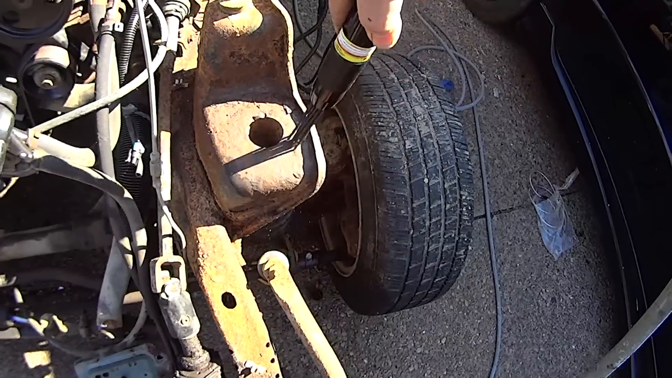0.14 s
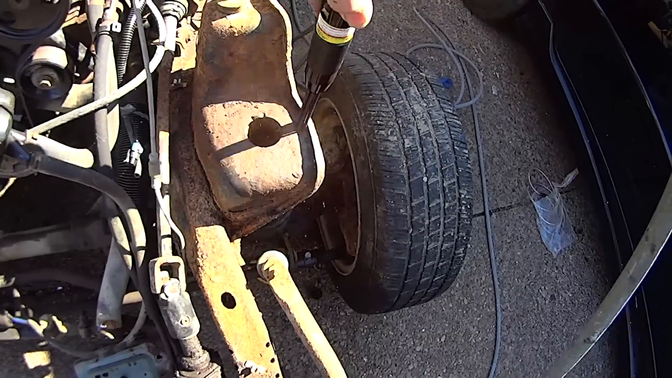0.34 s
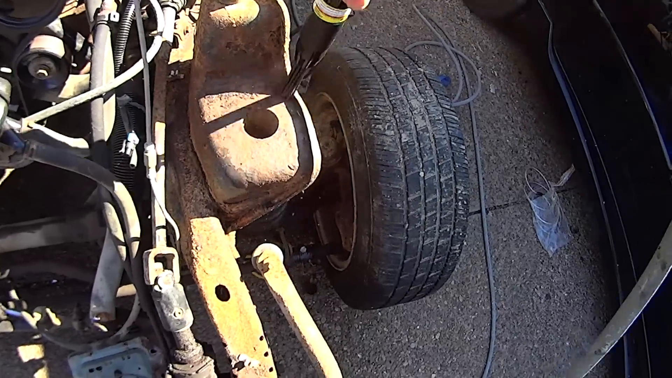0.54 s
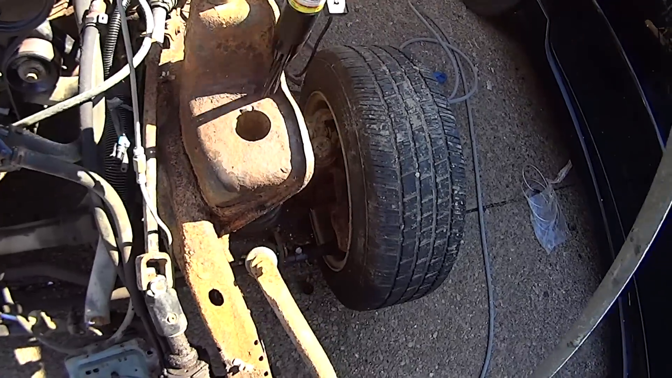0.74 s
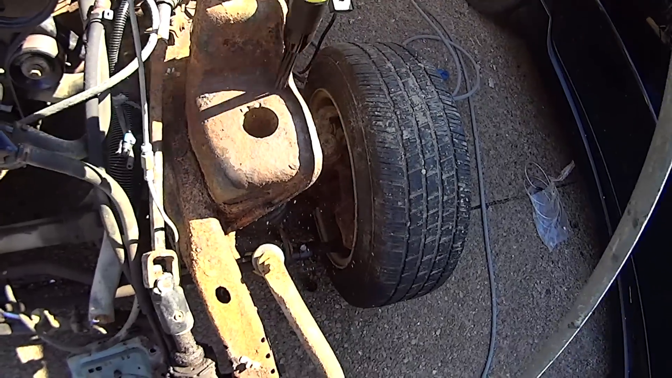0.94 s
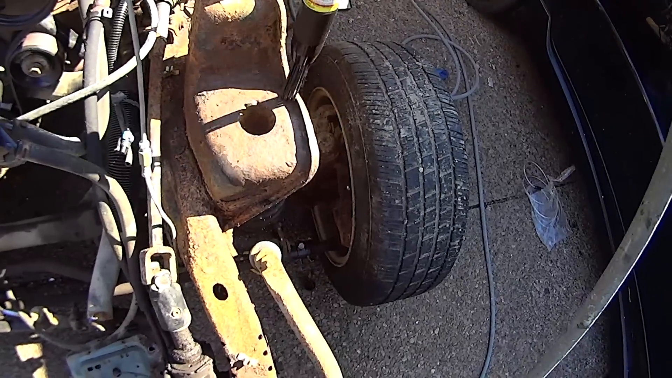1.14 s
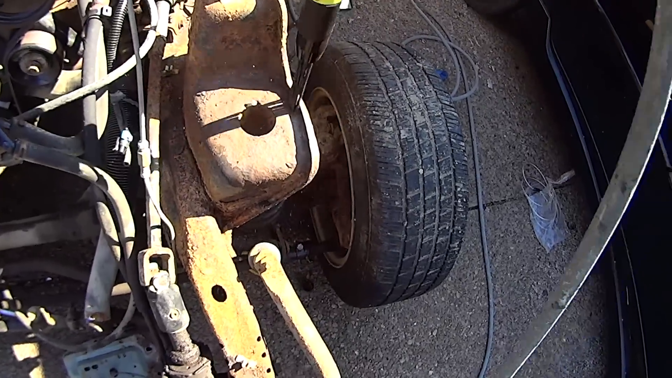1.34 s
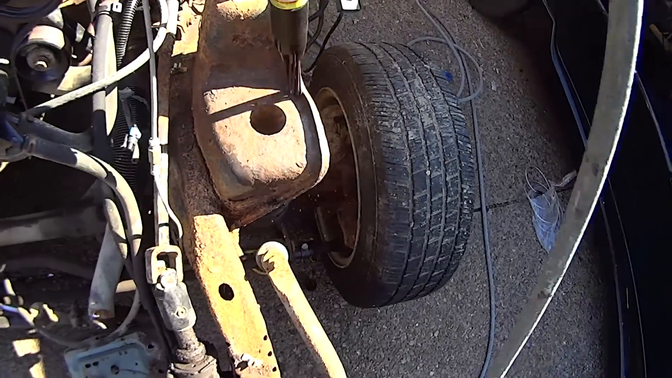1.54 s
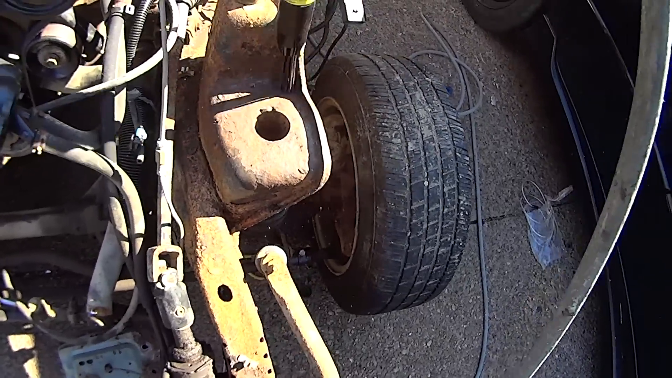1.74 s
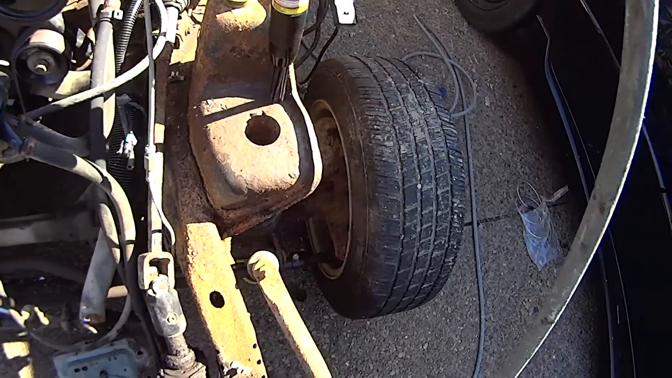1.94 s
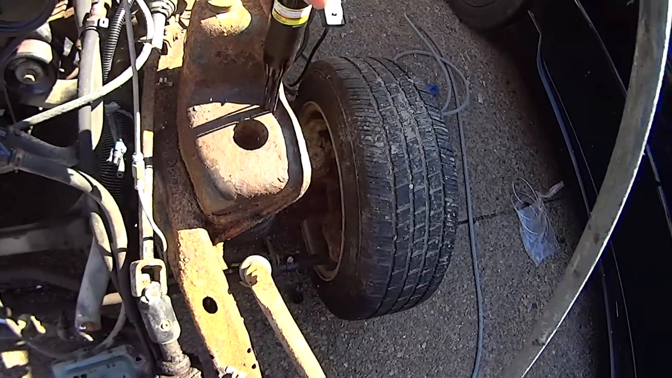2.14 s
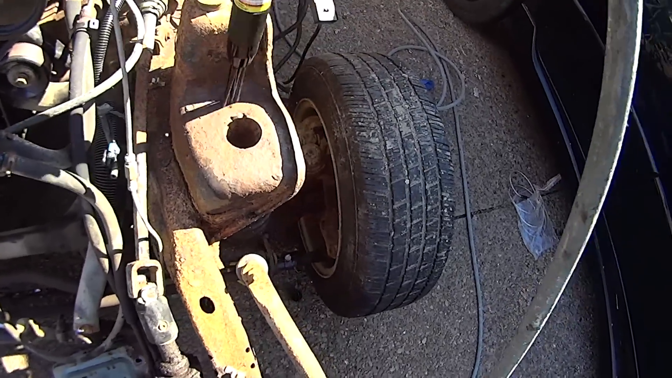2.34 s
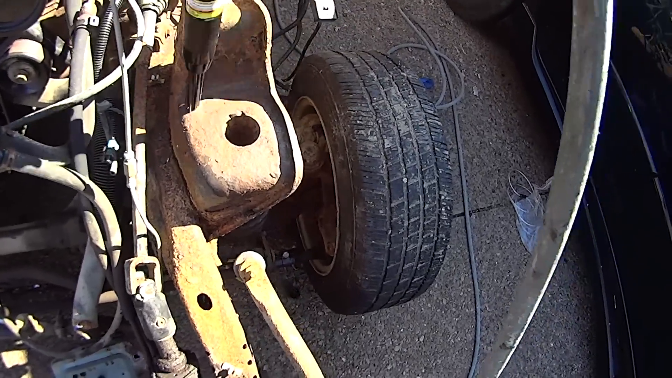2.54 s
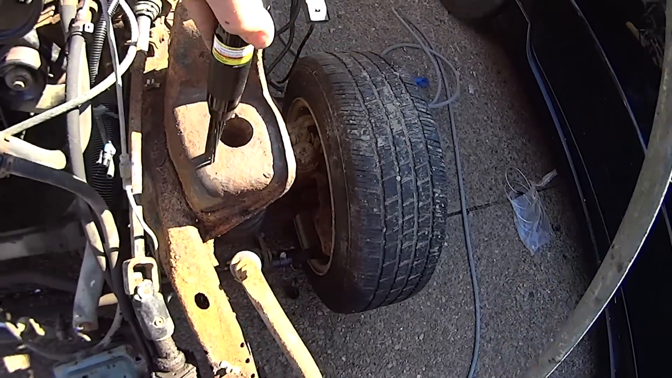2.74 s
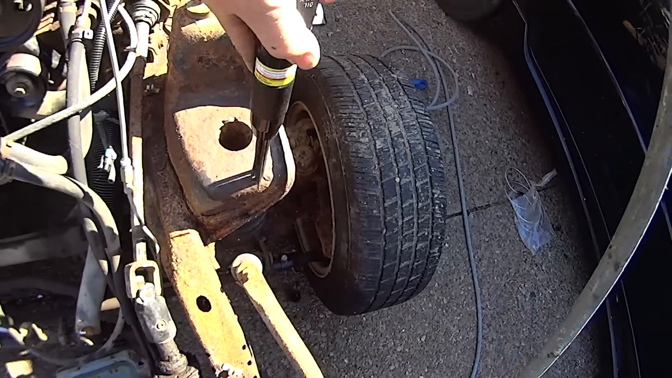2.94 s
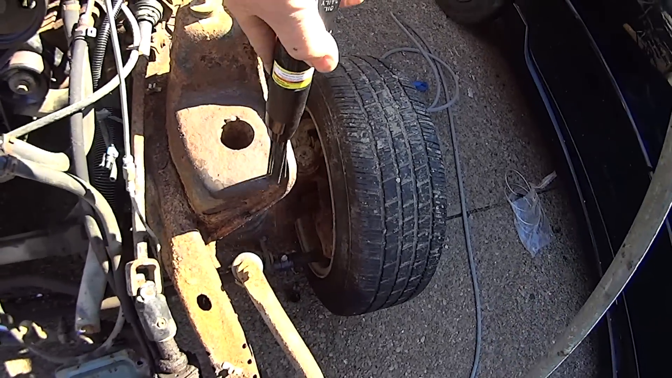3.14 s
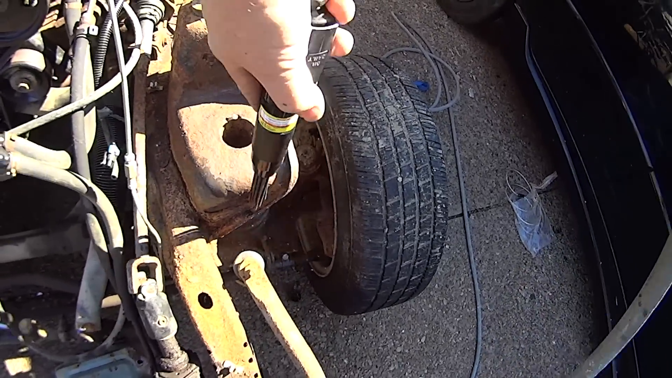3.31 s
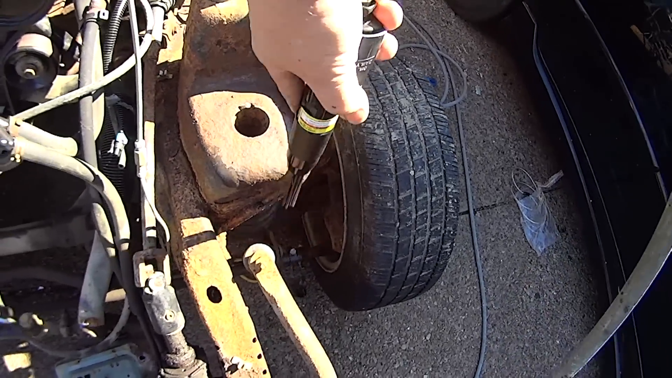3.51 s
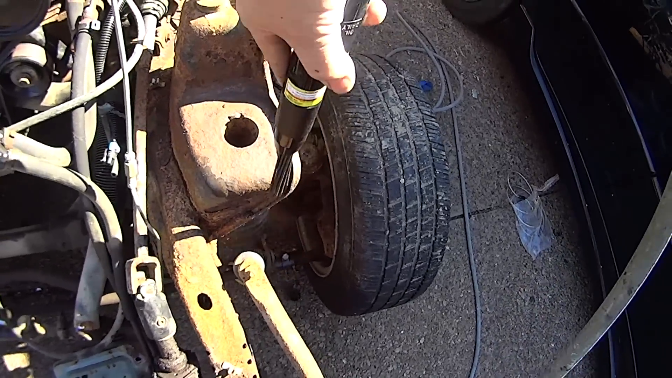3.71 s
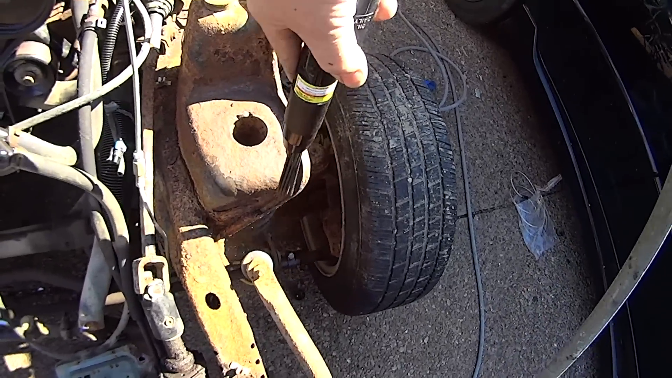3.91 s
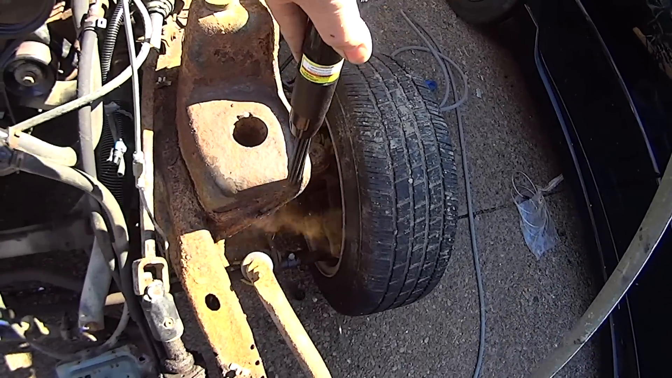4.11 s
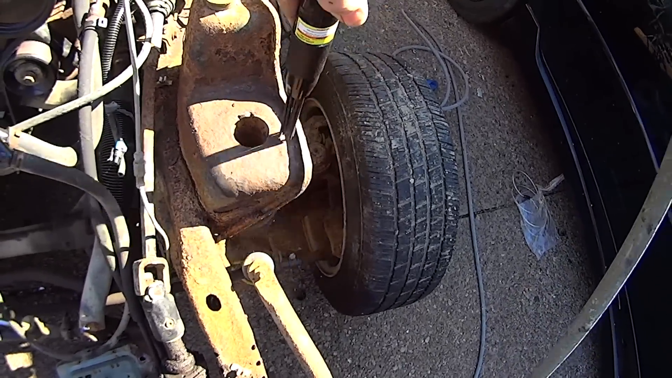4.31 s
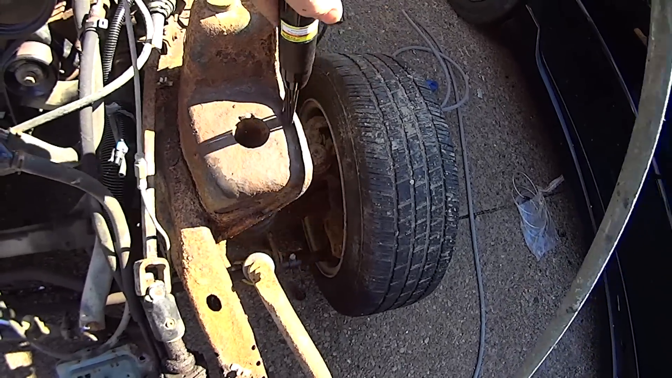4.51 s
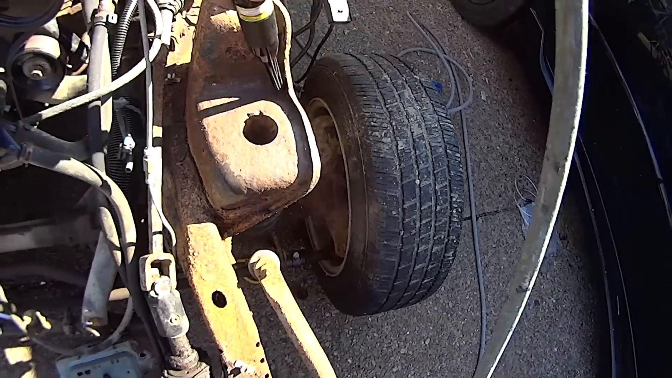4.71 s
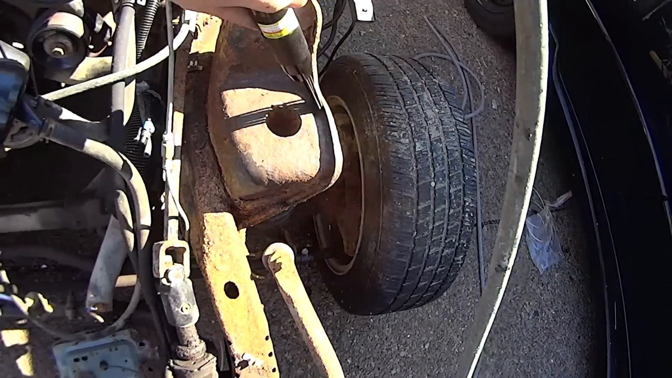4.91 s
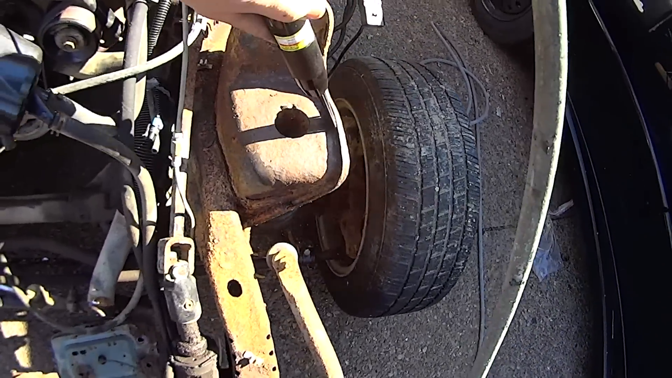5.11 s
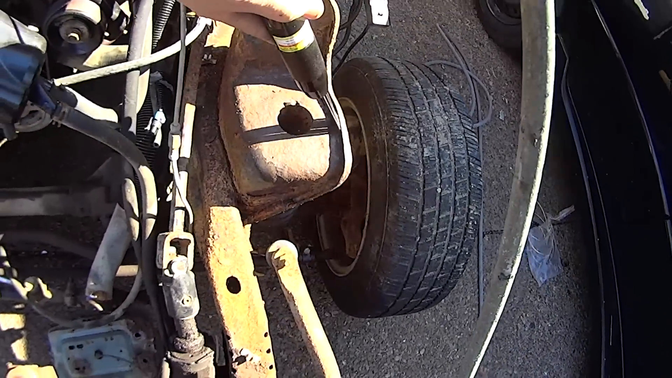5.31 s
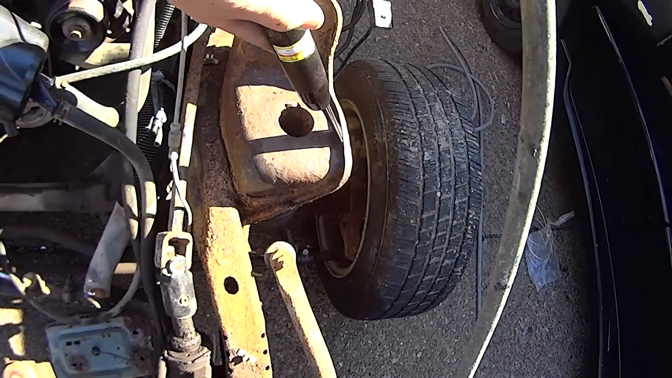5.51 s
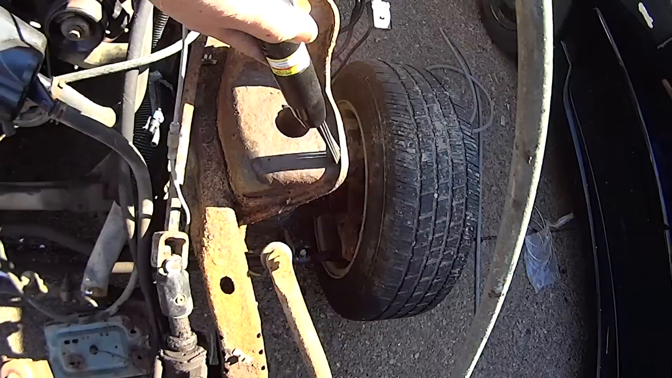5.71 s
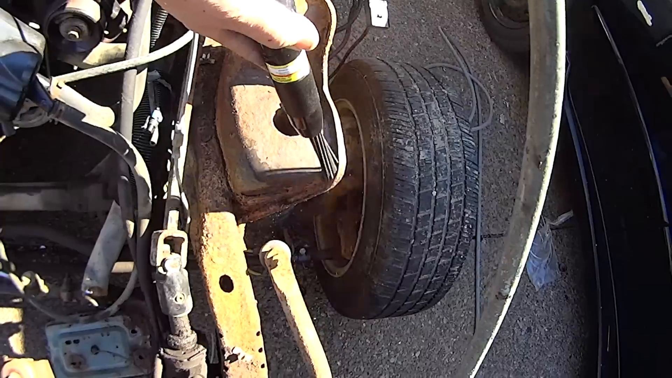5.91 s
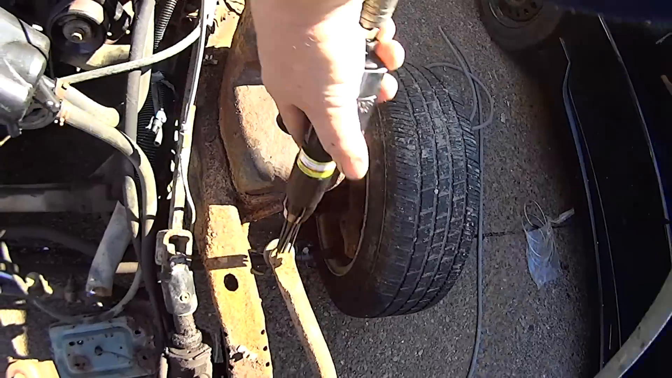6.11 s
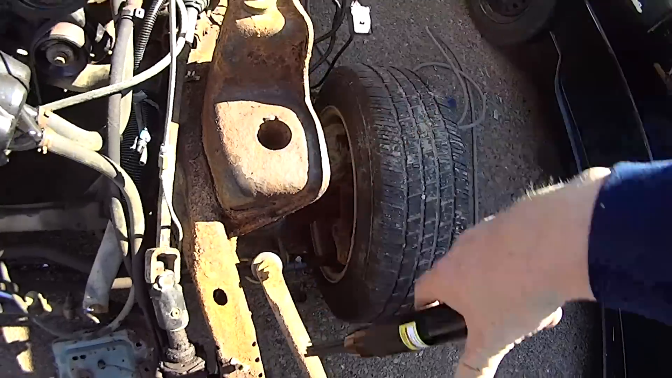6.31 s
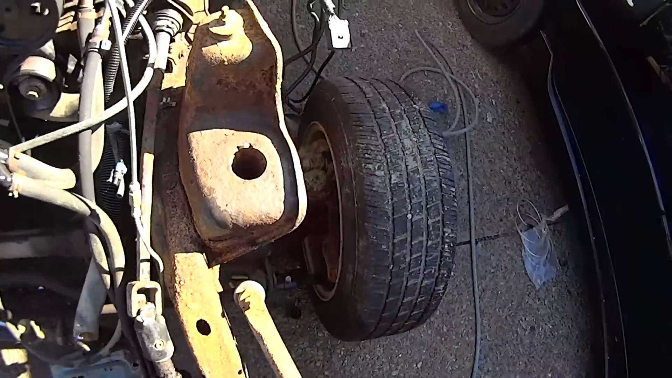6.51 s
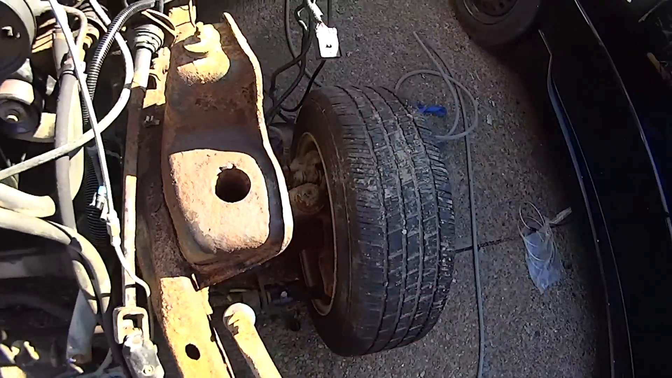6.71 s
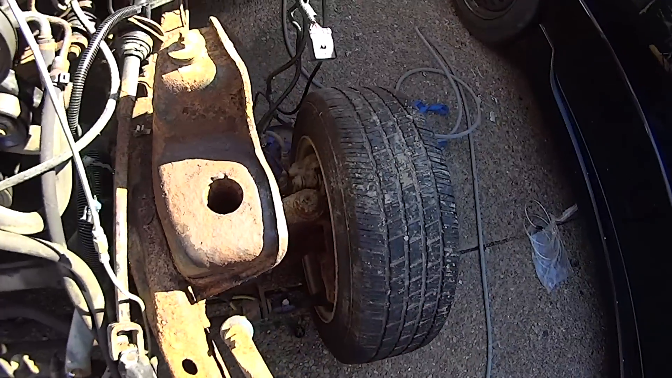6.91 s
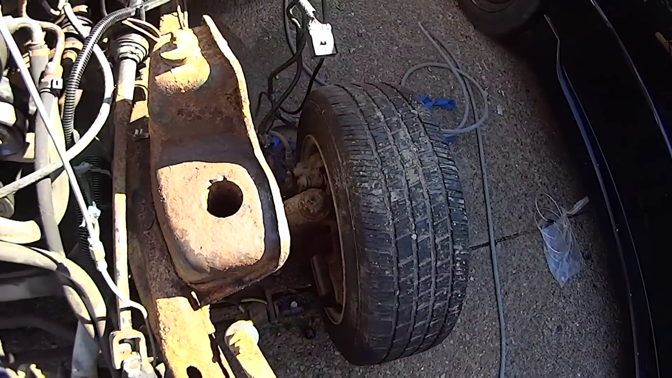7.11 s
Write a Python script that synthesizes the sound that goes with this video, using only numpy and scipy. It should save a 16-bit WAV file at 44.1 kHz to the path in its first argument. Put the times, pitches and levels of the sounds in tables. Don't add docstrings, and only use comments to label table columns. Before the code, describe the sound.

From 0 s a pneumatic needle scaler is already running at full rate, roughly eighty strokes a second, a loud, dense, gritty metallic rattle close to the microphone outdoors. Until 3 s it is slightly shaded and diffuse, with bright needle hiss and small fluctuating rings as it skips over the steel bracket. Around 3.1 s it bites the edge, jumps louder and turns crisper, a more regular hammering buzz. From 4.3 to 6 s it presses on bracket and rail, with rough, clanging steel resonances and a stronger barking exhaust; the tone shifts with each press. Near 6.0 s it thins and brightens, and at about 6.25 s it stops, with a brief clatter and high ring. Then near quiet: faint air-leak hiss with a thin whistle, a dying low hum to 6.7 s, soft wind bumps, faint knocks at 6.7 and 6.8 s, a harder one at 6.9 s, and stronger wind thumps toward 7.1 s.

```python
import sys
import numpy as np
from scipy import signal
from scipy.fft import rfft, irfft, next_fast_len
from scipy.io import wavfile
from scipy.ndimage import map_coordinates

SR = 44100
rng = np.random.default_rng(int(sys.argv[2]) if len(sys.argv) > 2 else 0)


def generate_wav(sig):
    pcm = np.round(np.clip(np.atleast_2d(sig).T, -1, 1) * 32767).astype(np.int16)
    wavfile.write(sys.argv[1], SR, pcm)


def to_linear_factor(level_db):
    exponent = np.asarray(level_db, float) / 20
    return 10 ** exponent


N = 315315

# time_s, needle_db, exhaust_db
TOOL_LEVELS = [(0.0, -29.5, -45.5), (0.15, -30.5, -49.5), (0.28, -30.5, -45), (0.4, -31.5, -48),
               (1.61, -31, -46.5), (1.81, -31.5, -45), (2.6, -31, -49.5), (3.11, -30, -47),
               (3.14, -24, -45), (3.23, -28, -41), (4.22, -27, -41.5), (4.33, -24.5, -46),
               (4.61, -26.5, -40), (5.14, -26, -37.5), (5.58, -26, -40.5), (5.96, -25.5, -39.5),
               (6.21, -27.5, -38), (6.24, -30.5, -79)]
# time_s, strokes_so_far
STROKE_COUNT = [(.0025, 0), (.1314, 10), (.5335, 42), (1.0368, 82), (1.5447, 122), (1.8528, 146),
                (2.4593, 194), (3.175, 250), (3.6008, 282), (3.8138, 298), (4.236, 330), (4.3455, 338),
                (4.4539, 346), (4.5601, 354), (4.6618, 362), (4.7652, 370), (4.9742, 386), (5.1855, 402),
                (5.3979, 418), (5.7185, 442), (6.0344, 466), (6.194, 478), (6.2085, 479), (6.2215, 480),
                (6.241, 482), (7.15, 550)]
# time_s, in_step_share, bunched_share
NEEDLE_TIMING = [(0, .12, .4), (3.05, .12, .4), (3.3, .97, .74), (4.2, .97, .72), (4.35, .7, .35),
                 (4.9, .85, .4), (5.97, .85, .45), (6.02, .97, .65)]
# time_s, share
REBOUND_SHARE = [(0, 0), (3.05, 0), (3.3, .05), (4.4, .08), (4.7, .3), (5.97, .35), (6.02, .12)]
REBOUND_AT, LULL = .44, .86

# freq_hz, level_db_per_hz
TIP_COLOUR = [(60, -64), (300, -13), (600, -2), (850, -11.5), (1020, -10.5), (1200, -11), (1450, -11.5),
              (1800, -9), (2500, -6), (3100, -4), (4200, -1.5), (5500, 3), (7000, -2.5), (8900, -6),
              (10300, -7.5), (11100, -8.5)]
# time_s, level_db
TIP_CONTACT = [(0, -3.5), (.5, 1), (1.2, 0.5), (1.65, 1), (2.1, 0.5), (2.55, 1), (2.75, -0.5), (2.9, -4),
               (3.1, -3), (3.3, -0.5), (3.7, 1), (4.2, -1.5), (4.6, 0.5), (5.2, -0.5), (5.6, -0.5),
               (6.0, -6.5), (6.2, -0.5)]
CONTACT_HZ = 4100
# freq_hz, width_hz, level_db
ROD_MODES = [(4600, 160, -9.5), (5590, 91, -5), (5890, 75, -7.5), (6720, 160, -8.5), (7725, 170, -1),
             (10253, 96, 1)]
# time_s, share
RODS_FREE_SHARE = [(0, 0), (3.25, 0), (3.35, 1), (4.6, 1), (4.8, 0), (6.0, 0), (6.1, 1)]
RODS_FREE_DB = 2
# freq_hz, level_db_per_hz
ANVIL_COLOUR = [(150, -38), (700, -5.5), (1050, -2.5), (1500, 0.5), (2500, -2), (4000, -6), (6000, -3),
                (8500, -15), (11000, 6)]
ANVIL_DB, ANVIL_LATE_S = -6, 0.00022

# freq_hz, width_hz, level_db
BRACKET_BACK_MODES = [(1010, 130, -8), (1660, 90, -12), (1760, 55, -1), (1870, 50, -1), (2150, 70, -4.5),
                      (2300, 80, -8), (2530, 90, -9)]
# freq_hz, width_hz, level_db
BRACKET_EDGE_MODES = [(1020, 150, -11), (1500, 80, -3), (1740, 60, -8), (1880, 40, 3), (2160, 60, -7),
                      (2297, 28, 0), (2510, 30, -2)]
# time_s, edge_share
BRACKET_PLACE = [(0, 0.26), (2.75, 0), (2.95, 0.93), (4.35, 1), (4.5, 0.3), (5.1, 0.2), (5.4, .95)]
# freq_hz, width_hz, level_db
RAIL_MODES = [(2970, 35, -7), (3145, 36, 2), (3380, 50, 1), (3497, 40, -2), (3720, 60, -3), (4300, 90, -6)]
# freq_hz, width_hz, level_db
RAIL_END_MODES = [(2970, 30, -6), (3145, 30, -6), (3497, 40, 0), (3720, 50, -6), (4300, 35, -1),
                  (4630, 50, -5)]
# time_s, end_share
RAIL_PLACE = [(0, 0), (4.3, 0), (4.45, .5), (4.9, .4), (5.3, 1)]
# time_s, level_db
BRACKET_SKIPS = [(.19, -48), (.36, -40), (.47, -49), (.61, -47), (1.02, -43), (1.171, -46.5), (1.371, -45),
                 (1.46, -42.5), (1.6, -42.5), (1.72, -46), (1.821, -45.5), (2.021, -45.5), (2.1, -43.5),
                 (2.19, -42), (2.26, -44), (2.34, -43), (2.46, -42.5), (2.561, -44.5)]
SKIP_S = 0.041
# start_s, hold_s, level_db
EDGE_BITES = [(2.928, 0.19, -42), (3.139, 0.012, -30.5), (3.169, 0.088, -36.5), (3.883, 0.019, -43),
              (4.272, 0.039, -35), (4.574, 0.068, -41), (4.684, 0.21, -37), (4.91, 0.093, -41),
              (5.435, 0.25, -48), (5.57, 0.11, -45), (5.698, 0.14, -38), (5.851, 0.012, -31),
              (5.895, 0.079, -36), (6.186, 0.012, -44)]
# start_s, hold_s, level_db
RAIL_PRESSES = [(.2, 0.15, -37.5), (.45, 0.087, -37), (.58, 0.19, -39), (.9, 0.023, -51),
                (1.3, 0.054, -35.5), (1.42, 0.16, -38.5), (1.95, 0.024, -37), (2.05, 0.018, -37),
                (2.13, 0.025, -36), (3.13, 0.036, -44), (3.6, 0.41, -46), (4.28, 0.021, -35),
                (4.4, 0.065, -29), (4.49, 0.069, -27), (4.6, 0.093, -28), (4.96, 0.054, -39),
                (5.06, 0.22, -30.5), (5.26, 0.12, -34), (5.5, 0.087, -36), (5.64, 0.14, -32.5),
                (5.82, 0.13, -34.5), (6.09, 0.15, -35.5)]
# time_s, bracket_db, rail_db
GRAZE_LEVELS = [(0, -46.5, -45.5), (2.55, -51, -48), (2.7, -56, -48), (3.2, -47, -38.5), (3.35, -66, -58),
                (4.15, -44.5, -45), (4.3, -48.5, -50), (5.95, -50, -36), (6.05, -69, -53)]
BITE_RISE_S, BITE_FALL_S = 0.026, 0.0082

# time_s, return_stroke_share, slip_strokes, port_facing_share
EXHAUST_VENT = [(0, .7, .013, .2), (3.05, .7, .013, .2), (3.25, .65, .008, 0), (4.5, .65, .008, 0),
                (4.58, .55, .005, 1), (6.0, .55, .005, 1), (6.15, .6, .01, .3)]
# freq_hz, level_db
THUMP_COLOUR = [(20, -65), (50, -36), (76, -11), (115, -8), (152, -9.5), (190, 4.5), (228, 1.5), (270, 3),
                (310, -8), (600, -78.5)]
# freq_hz, level_db
BARK_COLOUR = [(60, -68), (200, -33), (310, -3.5), (380, 2), (455, 4), (530, 5), (610, 2), (685, -13),
               (765, 5), (850, -8), (1020, -12), (1250, -12), (1600, -30), (3000, -56)]
# freq_hz, level_db
BARK_FACING_COLOUR = [(60, -55), (250, -28.5), (380, -4), (455, 1.5), (530, 1.5), (610, 4), (680, -2),
                      (725, -16), (765, 0.5), (870, -19), (1000, -7.5), (1070, -10.5), (1150, -18),
                      (1300, -14.5), (3000, -40.5)]
THUMP_DB, BARK_DB = -45, 3
THUMP_HIDDEN = 0.47
RELEASE_S, RUN_DOWN_S = 6.262, .03

# time_s, deepest_notch_hz, echo_share, delay_cycles
GROUND_ECHO = [(0, 1110, .95, 2.5), (.18, 1110, .95, 2.5), (.26, 1390, .85, 2.5), (2.58, 1400, .85, 2.5),
               (2.9, 1080, 1, 2.5), (3.0, 1100, .3, 2.5), (3.2, 1780, .2, 1.5), (3.28, 1780, .8, 1.5),
               (4.06, 1780, .8, 1.5), (4.12, 1030, .8, 2.5), (4.4, 1100, .9, 2.5), (4.6, 1370, .8, 2.5),
               (5.0, 1430, .6, 2.5), (5.3, 1430, .3, 2.5), (5.95, 1430, .25, 2.5), (6.02, 1850, .8, 1.5)]

# time_s, peak_db, casing_db
LAST_BLOWS = [
    (6.232, -17, -17),
    (6.295, -25.5, -18),
    (6.316, -34, -22),
]
# freq_hz, level_db, t60_s
SETTLE_MODES = [(3300, -6, .015), (3800, -7, .012), (5300, -5, .02), (6500, -8, .012), (7700, -8, .06),
                (10250, -14, .04)]
# freq_hz, level_db, t60_s
CASING_MODES = [(775, 2, .055), (1180, 1, .035)]
# freq_hz, level_db, t60_s
RING_OUT_MODES = [(7740, -26, 0.12), (8060, -44, 0.08), (10200, -28, 0.11), (10000, -40, 0.08)]
RING_OUT_S = 6.245
# time_s, peak_db, freq_hz, t60_s
GROUND_KNOCKS = [
    (6.721, -53, 827, 0.038),
    (6.818, -54, 834, 0.023),
    (6.911, -34.5, 1120, 0.0089),
]

HUM_HZ, HUM_DB, HUM_FADE_DB_PER_S = 186.4, -57.5, 30
HUM_FROM_S, HUM_PEAK_S, HUM_END_S = 2.3, 6.35, 6.69

# time_s, scattered_db
TOOL_EXPOSED = [(0, -9.5), (3.0, -11), (3.3, -0.5), (7.15, -0.5)]
# freq_hz, level_db
YARD_COLOUR = [(60, -8), (150, -7), (300, -4), (600, -10), (1000, 0.5), (2500, -6), (4000, -6), (5500, -28),
               (7500, -23), (8500, -12), (11000, -8)]
# freq_hz, left_lead_rad
PORT_LEAD = [(30, 0.47), (150, .6), (340, 0.7), (600, .45), (780, 0.4), (1500, 0.4), (2200, 0.5),
             (3300, 0.2), (4200, 0), (11000, 0)]
# freq_hz, left_minus_right_db
PORT_TILT = [(60, -.6), (150, -.8), (300, 1), (700, 1.2), (1400, 3.2), (2800, 1.6), (4500, -.2),
             (11000, -.2)]
# time_s, left_minus_right_db
TOOL_DRIFT = [(0, 0.5), (1.2, .2), (2.2, .5), (2.8, 1.1), (3.2, .5), (3.7, 0), (4.7, .5), (5.3, -0.5),
              (5.8, 0.3), (6.3, 0.5), (7, 1)]

# time_s, leak_db, rumble_db
AIR_LEVELS = [(0, -39.5, -83), (3.0, -42, -73), (3.6, -37, -64), (6.1, -43, -63), (6.2, -48, -69),
              (6.34, -63, -56), (6.63, -67.5, -57.5), (6.95, -67.5, -51), (7.15, -63, -40)]
# freq_hz, level_db_per_hz
LEAK_COLOUR = [(240, -43), (400, -9), (435, -14), (536, -9.5), (1530, -14), (2190, -10.5), (3060, -16),
               (4200, -11), (6060, -5), (7580, -9.5), (9610, -1), (11200, -8), (14600, -63), (22000, -120)]
# time_s, throat_hz, jet_hz
LEAK_WHISTLE = [(6.3, 2267, 7400), (6.6, 2206, 7400), (6.8, 2044, 7900), (7.15, 2050, 8260)]
# offset_hz, level_db_per_hz
THROAT_SPREAD = [(20, -3.0), (110, -6.5), (220, -24), (500, -22)]
JET_SPREAD = [(20, -1), (500, 3), (1200, -20), (3000, -60)]
THROAT_DB, JET_DB = 7, -2.0
# freq_hz, level_db_per_hz
RUMBLE_COLOUR = [(12, -33), (20, -26), (54, -11), (81, 5), (204, 4), (251, -5), (700, -30), (910, -67.5),
                 (1540, -120)]
# start_s, length_s, bump_db, freq_hz
WIND_GUSTS = [
    (6.659, .11, -45, 177),
    (6.917, .1, -45.5, 173),
    (7.031, .11, -46, 118),
]
BUMPS_PER_S = 90
# time_s, peak_db, freq_hz, push_pull_sign
WIND_JOLTS = [
    (6.693, -43.5, 283, 1),
    (6.967, -38.5, 205, 1),
    (7.073, -37, 185, 1),
    (7.09, -35, 159, -1),
    (7.103, -33.5, 181, 1),
]

CEILING, MIC_LOW_HZ = .36, 30
TOP_HZ, TOP_FALL_DB_PER_HZ = 11005, .55


def unit(x):
    return x / np.sqrt(np.mean(x ** 2) + 1e-20)


def along(points, hz):
    f, v = np.transpose(points)
    return np.interp(np.log(hz + 1), np.log(f + 1), v)


def curves(rows):
    s, *cols = np.transpose(rows)
    return [np.interp(np.arange(N) / SR, s, c) for c in cols]


def wobble(rate_hz):
    knots = rng.standard_normal(int(N * rate_hz / SR) + 4)
    return map_coordinates(knots, [np.arange(N) * rate_hz / SR])


def filtered(x, response):
    m = next_fast_len(N + SR // 2, True)
    return irfft(rfft(x, m) * response(np.fft.rfftfreq(m, 1 / SR)), m)[..., :N]


def struck(x, spectrum):
    size = 8192
    gain = to_linear_factor(along(spectrum, np.fft.rfftfreq(size, 1 / SR)))
    cep = irfft(np.log(gain + 1e-6))
    cep[1:size // 2] *= 2
    cep[size // 2 + 1:] = 0
    impulse = irfft(np.exp(rfft(cep)))[:size // 2]
    return signal.fftconvolve(x, impulse)[:N]


def ringing(x, modes, turn=-1):
    def response(f):
        return sum(turn ** k * to_linear_factor(db) * 1j * f * w / (c * c - f * f + 1j * f * w)
                   for k, (c, w, db) in enumerate(modes))
    return filtered(x, response)


def decaying(modes, t):
    return sum(to_linear_factor(db - 60 * t / t60) * np.sin(2 * np.pi * hz * t) for hz, db, t60 in modes)


def scaler():
    needle_db, vent_db = curves(TOOL_LEVELS)
    turns, = curves(STROKE_COUNT)
    running = np.clip((RELEASE_S - np.arange(N) / SR) / RUN_DOWN_S, 0, 1)
    needles = clatter(turns, running, needle_db) + rods(turns, running, needle_db)
    blows = running * to_linear_factor(needle_db + ANVIL_DB) * anvil(turns)
    return needles + steel(turns, running, needle_db) + blows + exhaust(turns, running, vent_db)


def taps(turns, count, lag, scatter_db):
    strokes = int(turns[-1])
    late, later, free, pick, kind = rng.random((5, strokes, count))
    base = np.arange(strokes)[:, None]
    step, bunch = (np.interp(base, turns, c) for c in curves(NEEDLE_TIMING))
    together = np.interp(base, turns, curves(REBOUND_SHARE)[0])
    at_blow = -lag * np.log(1 - late)
    bounced = np.where(free < together, REBOUND_AT + at_blow, LULL * np.minimum(late, .4 + later))
    timed = np.where(kind < bunch, at_blow, bounced)
    when = base + np.where(pick < step, timed, free)
    at = np.interp(when, turns, np.arange(N)).astype(int).ravel().clip(0, N - 1)
    force = to_linear_factor(scatter_db * rng.standard_normal(late.shape).clip(-2, 2))
    force *= rng.choice([-1, 1], late.shape)
    force *= to_linear_factor(0.4 * rng.standard_normal((strokes, 1)))
    return unit(np.bincount(at, force.ravel(), N)[:N])


def clatter(turns, running, needle_db):
    tips = running * taps(turns, count=90, lag=.075, scatter_db=2.0)
    sound = unit(struck(tips, TIP_COLOUR)) * to_linear_factor(needle_db - 0.96)
    body = filtered(sound, lambda f: 1 / (1 + (f / CONTACT_HZ) ** 6))
    return sound + (to_linear_factor(curves(TIP_CONTACT)[0]) - 1) * body


def rods(turns, running, needle_db):
    lifted_db = 5 * np.clip((np.arange(N) / SR - 6.22) / 0.024, 0, 1)
    free_db = RODS_FREE_DB * curves(RODS_FREE_SHARE)[0]
    level_db = needle_db + lifted_db + free_db + 9.0 + 1.2 * wobble(16)
    hits = running * taps(turns, count=40, lag=.1, scatter_db=1.5)
    return ringing(hits * to_linear_factor(level_db), ROD_MODES)


def pressed(bites, graze_db):
    t = np.arange(N) / SR
    power = to_linear_factor(2 * graze_db)
    for s, hold, db in bites:
        corners_s = [s - BITE_RISE_S, s, s + hold, s + hold + BITE_FALL_S]
        power = power + to_linear_factor(2 * db) * np.interp(t, corners_s, [0, 1, 1, 0]) ** 2
    return 10 * np.log10(power)


def steel(turns, running, needle_db):
    blows = running * taps(turns, count=30, lag=.13, scatter_db=5.5)

    def bite(db):
        excess_db = 0.14 * (db - needle_db + 13.5)
        return to_linear_factor(db + excess_db + 20.0 + 0.79 * wobble(25)) * blows

    bracket_graze_db, rail_graze_db = curves(GRAZE_LEVELS)
    skips = [(s - SKIP_S / 2, SKIP_S, db) for s, db in BRACKET_SKIPS]
    bracket = bite(pressed([*skips, *EDGE_BITES], bracket_graze_db))
    rail = to_linear_factor(-4.5) * bite(pressed(RAIL_PRESSES, rail_graze_db))
    edge, = curves(BRACKET_PLACE)
    end, = curves(RAIL_PLACE)
    out = ringing((1 - edge) * bracket, BRACKET_BACK_MODES, 0.97)
    out += ringing(edge * bracket, BRACKET_EDGE_MODES, 1)
    return out + ringing((1 - end) * rail, RAIL_MODES) + ringing(end * rail, RAIL_END_MODES)


def anvil(turns):
    whole = np.arange(1, int(turns[-1]))
    slip, size = rng.standard_normal((2, len(whole)))
    late = np.round(abs(slip) * ANVIL_LATE_S * SR).astype(int)
    blows = np.zeros(N)
    blows[np.interp(whole, turns, np.arange(N)).astype(int) + late] = to_linear_factor(1.1 * size)
    step, bunch = curves(NEEDLE_TIMING)
    return unit(struck(blows, ANVIL_COLOUR)) * step * bunch


def exhaust(turns, running, vent_db):
    whole = np.arange(1, int(turns[-1]))
    share, loose, facing = curves(EXHAUST_VENT)
    slip = np.interp(whole, turns, loose) * rng.standard_normal(len(whole))
    at = np.interp(whole + slip, turns, np.arange(N)).astype(int)
    puffs = np.zeros(N)
    puffs[at] = to_linear_factor(rng.normal(0, 0.43, len(whole)))
    puffs, swirl = unit(puffs), rng.standard_normal(N)
    back = np.roll(puffs, round(.0062 * SR))
    thump_db = THUMP_DB + THUMP_HIDDEN * curves(TOOL_EXPOSED)[0]
    thump = unit(struck(puffs + .24 * swirl, THUMP_COLOUR)) * to_linear_factor(thump_db - .1)
    vent = puffs - share * back + .16 * swirl
    away, toward = unit(struck(vent, BARK_COLOUR)), unit(struck(vent, BARK_FACING_COLOUR))
    bark = ((1 - facing) * away + facing * toward) * to_linear_factor(vent_db + BARK_DB - 3)
    return running * (thump + bark)


def ground(x):
    notch_hz, share, cycles = curves(GROUND_ECHO)
    late = map_coordinates(x, [np.arange(N) - cycles * SR / notch_hz], order=1)
    echo = filtered(late, lambda f: f ** 4 / (f ** 4 + 800 ** 4) / (1 + (f / 1950) ** 8))
    return x + np.clip(share, 0, 1) * echo


def knocks():
    out, t = np.zeros(N + SR), np.arange(SR // 5) / SR
    for s, db, casing_db in LAST_BLOWS:
        crack = 2.0 * to_linear_factor(-60 * t / 0.022) * np.gradient(rng.standard_normal(len(t)))
        hit = to_linear_factor(db - 8.0) * (decaying(SETTLE_MODES, t) + crack)
        hit += to_linear_factor(db + casing_db - 0.5) * decaying(CASING_MODES, t)
        out[round(s * SR):][:len(t)] += hit
    out[round(RING_OUT_S * SR):][:len(t)] += (1 - np.exp(-t / .006)) * decaying(RING_OUT_MODES, t)
    for s, db, hz, t60 in GROUND_KNOCKS:
        modes = [(hz, -3, t60), (0.67 * hz, -3, t60), (1.0 * hz, -16, t60)]
        out[round(s * SR):][:len(t)] += to_linear_factor(db) * (1 - np.exp(-t / 0.00046)) * decaying(modes, t)
    return out[:N]


def beam():
    t = np.arange(N) / SR
    build = np.clip((t - HUM_FROM_S) / (HUM_PEAK_S - HUM_FROM_S), 0, 1)
    stop = np.clip((HUM_END_S - t) / 0.028, 0, 1)
    db = HUM_DB - HUM_FADE_DB_PER_S * np.clip(t - HUM_PEAK_S, 0, None)
    return np.sqrt(2) * build * stop * to_linear_factor(db + 2.8 * wobble(30)) * np.sin(2 * np.pi * HUM_HZ * t)


def yard(x):
    t = np.arange(SR // 10) / SR
    tail = unit(rng.standard_normal((2, len(t))) * to_linear_factor(-60 * t / .08)) / np.sqrt(len(t))
    wet = signal.fftconvolve(x[None], tail, axes=1)[:, :N]
    return filtered(wet, lambda f: to_linear_factor(along(YARD_COLOUR, f)))


def turbulence(spectrum, side_gain):
    white = rng.standard_normal((2, N))
    return unit(filtered(white, lambda f: to_linear_factor(along(spectrum, f)))) * [[1], [side_gain]]


def leak():
    level_db = curves(AIR_LEVELS)[0] + 0.7 * wobble(34)
    throat_tone, jet_tone = (np.sin(2 * np.pi * np.cumsum(hz) / SR) for hz in curves(LEAK_WHISTLE))
    throat = turbulence(THROAT_SPREAD, 0.39) * throat_tone
    released = np.arange(N) > RELEASE_S * SR
    jet = to_linear_factor(4.2 * wobble(10)) * turbulence(JET_SPREAD, 0.037) * jet_tone
    hiss = turbulence(LEAK_COLOUR, 0.083)
    return to_linear_factor(level_db) * (hiss + to_linear_factor(THROAT_DB) * released * throat + to_linear_factor(JET_DB) * jet)


def rumble():
    level_db = curves(AIR_LEVELS)[1] - 10.5 + 4.9 * wobble(43)
    return to_linear_factor(level_db) * turbulence(RUMBLE_COLOUR, 0.49)


def wind():
    out, t = np.zeros(N + SR), np.arange(SR // 10) / SR
    bumps = list(WIND_JOLTS)
    for start, length, db, hz in WIND_GUSTS:
        draws = rng.random((12, 3))[:round(length * BUMPS_PER_S)]
        for k, (late, size, pitch) in enumerate(draws):
            at_s = start + (k + 0.59 * late) / BUMPS_PER_S
            bump_db = db + 8 * (size - .5) - 9 * np.exp(-k / 1.0)
            bumps.append((at_s, bump_db, hz * np.exp(.5 * (pitch - .5)), 1))
    for s, db, hz, way in bumps:
        cycle = hz * t
        swing = np.sin(2 * np.pi * cycle) * (1 - np.exp(-5 * cycle)) ** 2 * np.exp(-2.4 * cycle)
        out[round(s * SR):][:len(t)] += np.sign(way) * to_linear_factor(db + 13) * swing
    return out[:N]


def scene():
    near = ground(scaler()) + knocks() + beam() + wind()
    sides = np.array([[.5], [-.5]])

    def port(f):
        low_cut = f ** 4 / (f ** 4 + MIC_LOW_HZ ** 4)
        return to_linear_factor(sides * along(PORT_TILT, f)) * np.exp(1j * sides * along(PORT_LEAD, f)) * low_cut

    direct = filtered(near, port) * to_linear_factor(sides * curves(TOOL_DRIFT)[0])
    scattered = yard(near * to_linear_factor(curves(TOOL_EXPOSED)[0]))
    mid, side = leak() + rumble()
    return direct + scattered + np.array([mid + side, mid - side])


def low_pass(x):
    return signal.sosfilt(signal.butter(12, 12270, fs=SR, output="sos"), x)


def record(dry):
    limited = dry / (1 + np.abs(dry / CEILING) ** 4) ** (1 / 4)
    mix = filtered(limited, lambda f: to_linear_factor(-TOP_FALL_DB_PER_HZ * np.clip(f - TOP_HZ, 0, None)))
    return low_pass(mix)


dry = scene()
out = record(dry)
generate_wav(out)
```